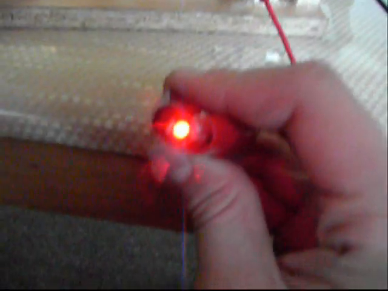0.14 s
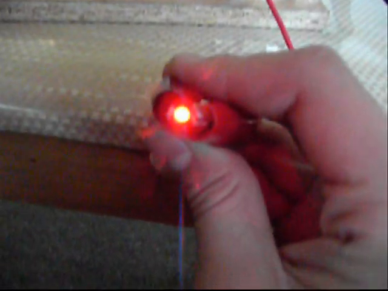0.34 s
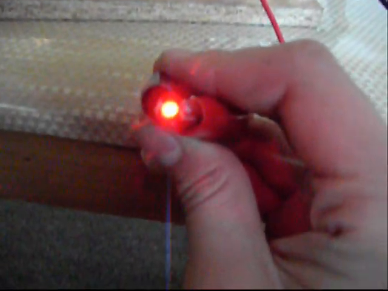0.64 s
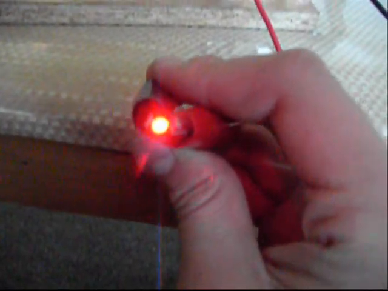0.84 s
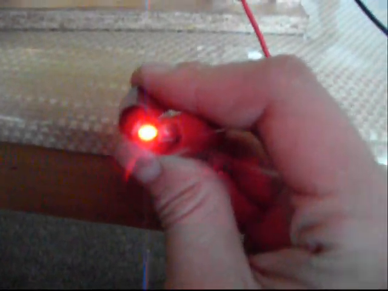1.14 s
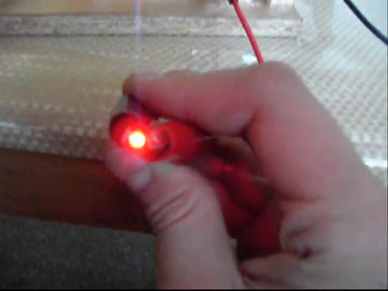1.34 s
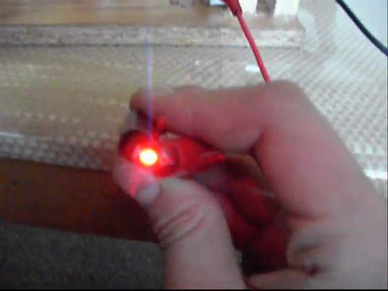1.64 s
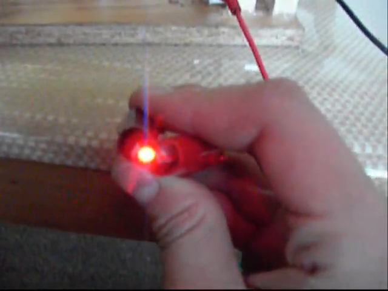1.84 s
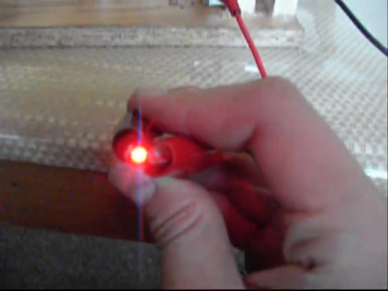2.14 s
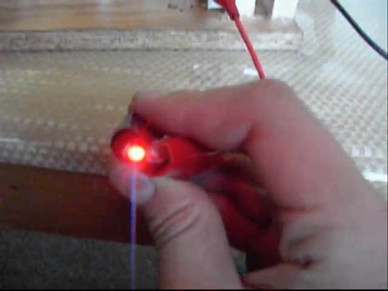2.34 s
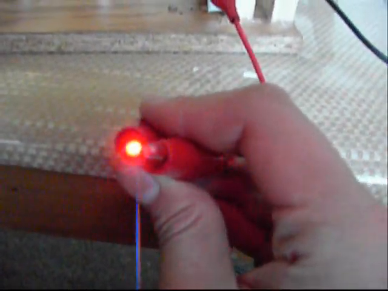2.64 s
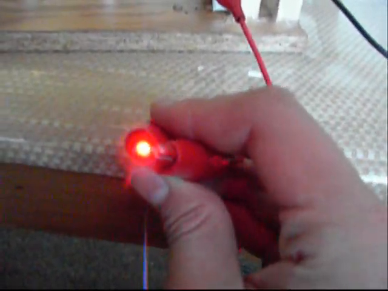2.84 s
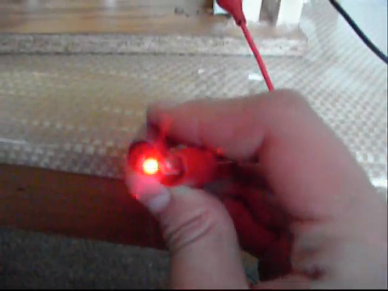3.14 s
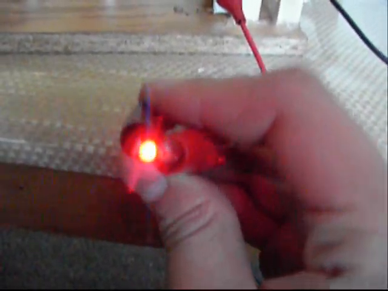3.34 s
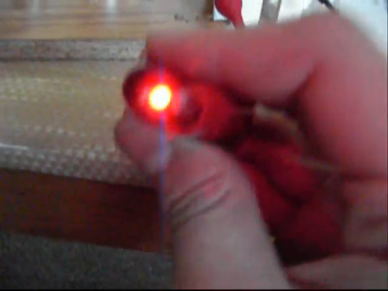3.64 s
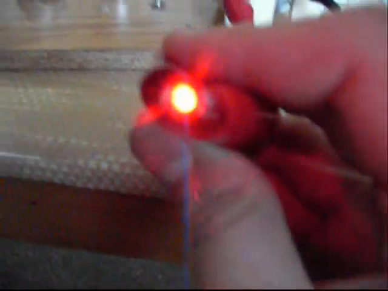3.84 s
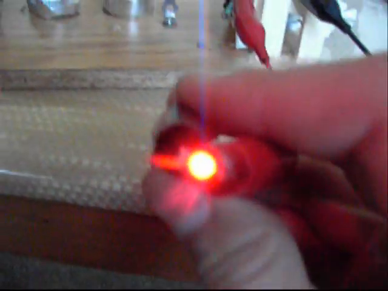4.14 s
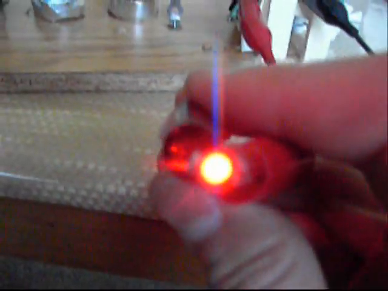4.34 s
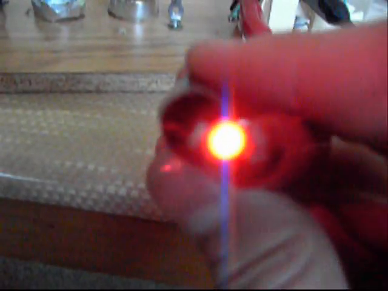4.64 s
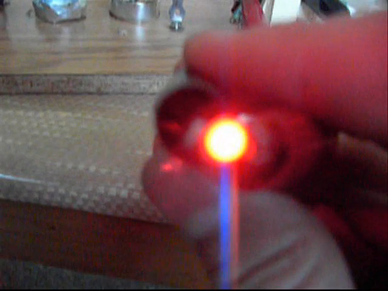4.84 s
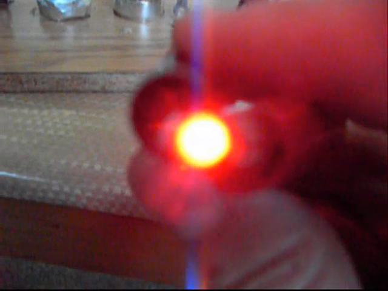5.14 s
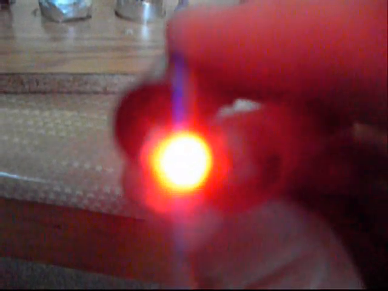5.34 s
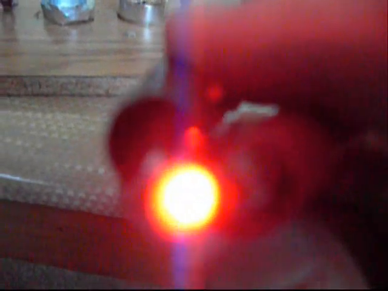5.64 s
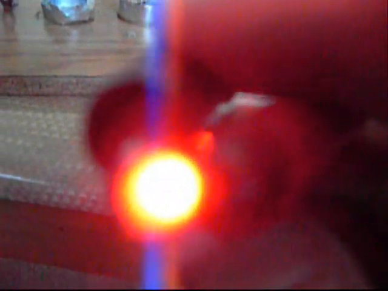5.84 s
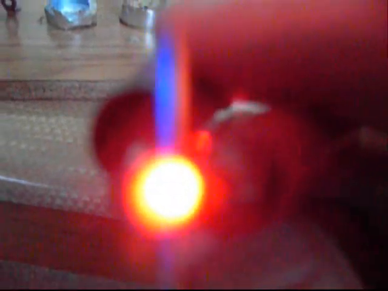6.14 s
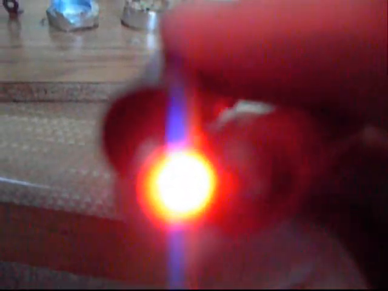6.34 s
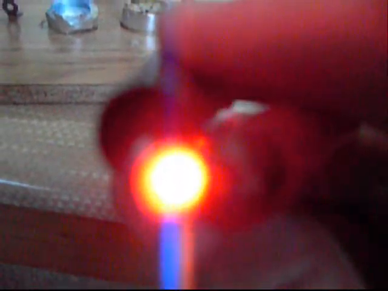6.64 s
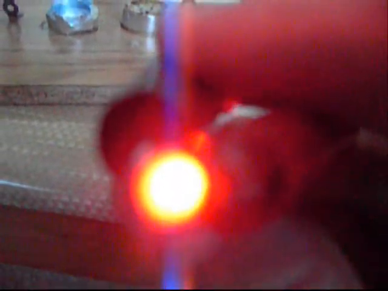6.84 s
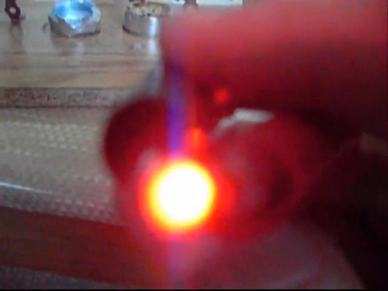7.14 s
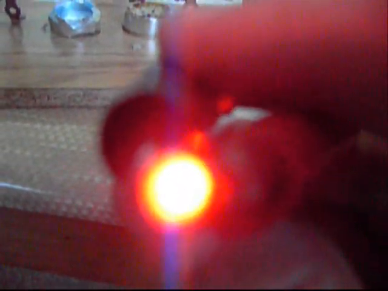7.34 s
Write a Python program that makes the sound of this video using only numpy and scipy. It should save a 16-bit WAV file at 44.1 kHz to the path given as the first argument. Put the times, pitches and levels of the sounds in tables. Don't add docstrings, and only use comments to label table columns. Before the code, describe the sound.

From 0 s a small hot-air engine is already running on a wooden table, close to a crude microphone in a small room. Its linkage knocks with a dry, tinny can-like ring roughly 7.3 times a second, with a usually softer back knock almost midway through each turn, making about fifteen hits a second. Each is followed by a brief grainy piston scrape. From about 1 to 3.4 s the linkage sounds slacker: knocks smear into short rattles with brighter thin-metal rings, and the table hum swells unevenly, notably near 1.4 and 2.8 s. After 3.5 s the beat becomes crisper and cleaner, with small pin ticks just before many strokes. Flame hiss, low rumble and a faint steady mid-pitched generator whine continue throughout, slightly lower after 4.5 s. Knocks soften slightly around 7.1 s; the running continues to the end, about 7.5 s. Coarse digital grit brightens everything.

```python
import sys
import numpy as np
from scipy import signal
from scipy.fft import rfft, irfft
from scipy.io import wavfile
from scipy.ndimage import uniform_filter1d, map_coordinates

SR = 44100
rng = np.random.default_rng(int(sys.argv[2]) if len(sys.argv) > 2 else 0)


def wav_out(sig):
    wavfile.write(sys.argv[1], SR, np.round(np.clip(np.atleast_2d(sig).T, -1, 1) * 32767).astype(np.int16))


def invert_db(x):
    u = np.asarray(x, float) / 20
    return 10 ** u


N = 329868

# pitch_hz [Hz], level_db [dB], fade_s [s to fall 60 dB]
CAN = [(1610, -16, .03), (1735, -11, .03), (1800, -8, .02), (1873, 0, .015), (1990, -7, .014),
       (2092, -4, .016), (2200, -7, .02)]


def unit(x):
    return x / np.sqrt(np.mean(x ** 2))


def coloured(points):
    hz, db = np.transpose(points)
    log_pitch = np.log(np.fft.rfftfreq(N, 1 / SR) + 1)
    gain = invert_db(np.interp(log_pitch, np.log(hz), db))
    return unit(irfft(rfft(rng.standard_normal(N)) * gain, N))


def walk(rate):
    hold = int(SR / rate)
    levels = np.repeat(rng.standard_normal(N // hold + 1), hold)
    return uniform_filter1d(uniform_filter1d(levels, hold), hold)[:N]


def ring(modes, hz=None, reach_hz=230, scatter_db=0, stretch=1, size=SR // 8, against=-1):
    f, db, t60 = np.transpose(modes)[:, :, None]
    if hz:
        db = db - 6 * ((f - hz) / reach_hz) ** 2
    t = np.arange(size) / SR
    sign = against ** np.arange(len(modes))[:, None]
    fade = np.exp(-np.log(1000) * t / t60)
    tones = np.sin(2 * np.pi * f * stretch * t)
    return np.sum(sign * invert_db(db + scatter_db) * fade * tones, axis=0)


def add(out, s, piece):
    i = int(s * SR)
    out[i:i + len(piece)] += piece[:N - i]


def state(s):
    # time_s [s], near_db [dB], slack_db [dB], shake_db [dB]
    slow_changes = [(0, 0, -0.5, 2), (.5, 1.5, 1, 4.5), (1.1, -1, 5, -6.5), (1.4, 3.3, 5, 12),
                    (2.0, 1.5, 8, -2), (2.8, 3, 6.5, 9), (3.25, 4, 1.5, -2.5), (3.75, -2, 4.5, 7.5),
                    (4.1, 2.4, 2, 8), (4.5, -1.5, 1.5, -1.5), (5.25, -2.5, 2.5, -5), (7.0, -2, 0, -1.5),
                    (7.48, -2, 4, 2.5)]
    at, *columns = np.transpose(slow_changes)
    return [np.interp(s, at, c) for c in columns]


def flame_hiss(near_db):
    # pitch_hz [Hz], level_db [dB per Hz]
    flame_colour = [(150, -58.5), (250, -19), (370, -2), (480, -11.5), (650, -2.5), (880, -7.5),
                    (1250, -4.5), (1540, -8), (1900, -2), (2250, -3.5), (2450, -10), (3150, -10),
                    (3700, -11.5), (4500, -35.5)]
    return invert_db(near_db - 36 + walk(9)) * coloured(flame_colour)


def table_drone(shake_db):
    hum_colour = [(250, -37.5), (285, -1.5), (308, 5.5), (335, -0.5), (380, -43.5)]
    return invert_db(shake_db - 48.5 + 4.0 * walk(28)) * coloured(hum_colour)


def table_rumble(near_db, shake_db):
    # pitch_hz [Hz], level_db [dB per Hz]
    rumble_colour = [(20, -31.5), (55, -19), (95, -12.5), (140, -1), (210, 3), (260, -17), (320, -45)]
    return invert_db(-53.5 + 0.24 * shake_db + near_db + 3.0 * walk(16)) * coloured(rumble_colour)


def generator_whine(near_db):
    pitch_hz = 552.3 + 1.5 * walk(3)
    level = np.sqrt(2) * invert_db(-43.5 + .8 * near_db + 1.1 * walk(15))
    return level * np.sin(2 * np.pi * np.cumsum(pitch_hz) / SR)


def rattle(level_db, per_s=1200):
    size_db = np.minimum(4 * rng.exponential(size=N), 10)
    hits = (rng.random(N) < per_s / SR) * invert_db(size_db) * rng.choice([-1, 1], N)
    ringing = signal.fftconvolve(hits, ring(CAN, 2100, 540))[:N]
    return invert_db(level_db + 2.7 * walk(40)) * unit(ringing)


def steady():
    near_db, _, shake_db = state(np.arange(N) / SR)
    table = table_drone(shake_db) + table_rumble(near_db, shake_db)
    return flame_hiss(near_db) + table + generator_whine(near_db) + rattle(near_db - 38)


def strokes():
    # start_s [s], power_knock_db [dB],
    # thin_parts_db [dB against the knock], back_knock_db [dB]
    flywheel_turns = [(0.03, -3.5, -18, -37), (0.1615, -7, -13.5, -14.5), (0.296, -4.5, -12.5, -8.5),
                      (0.4297, -5, -15, -12), (0.5619, -7.5, -6.5, -9), (0.6946, -4.5, -8, -3),
                      (0.8279, -2.5, -15, -9), (0.9631, -7.5, -7.5, -12), (1.0952, -8, -6, -13),
                      (1.2297, -11.5, 0, -6), (1.3632, -9, 0.5, -13.5), (1.5002, -7, -6.5, -5),
                      (1.633, -7, -8.5, -21), (1.7695, -6.5, -9.5, -10), (1.9052, -11, -4, -10),
                      (2.0399, -4.5, -4.5, -5), (2.176, -9.5, -6, -8.5), (2.311, -7.5, -1, -8.5),
                      (2.4468, -8, -0.5, -8), (2.5826, -10, -9, -12), (2.7186, -8, -1.5, -12.5),
                      (2.8564, -9, -8, -8), (2.9904, -4, -6, -17.5), (3.126, -9, -11, -5),
                      (3.2641, -1.5, -8.5, -5.5), (3.3996, -7.5, 1.5, -10),
                      (3.535, -2.5, -14, -8.5), (3.6735, -6, -30, -11.5), (3.81, -7, -13, -4.5),
                     (3.9472, -7, -4, -7), (4.0842, -4, -17, -10), (4.222, -3, -19, -13.5),
                     (4.3595, -4.5, -17, -9), (4.4971, -3.5, -35, -10), (4.6333, -6, -28, -11.5),
                     (4.7716, -6, -13, -10), (4.9089, -4, -19, -10), (5.048, -5, -16, -14),
                     (5.1843, -9, -17, -12.5), (5.3238, -3.5, -14, -10.5), (5.462, -5.5, -21, -16.5),
                     (5.599, -3.5, -23, -10.5), (5.7382, -10.5, -8.5, -13.5), (5.8746, -3, -16.5, -8),
                     (6.0138, -4.5, -20, -27), (6.1519, -2.5, -17, -13), (6.2908, -3.5, -15, -19.5),
                     (6.429, -5, -34, -16.5), (6.5677, -4, -10.5, -17), (6.7053, -9, -15.5, -13),
                     (6.843, -4, -19, -6.5), (6.9819, -2.5, -19, -12), (7.1204, -10, -8.5, -15),
                     (7.2583, -11, -10, -16), (7.3969, -11, -5, -9)]
    s, db, thin_db, back_db = np.transpose(flywheel_turns)
    turn = np.arange(len(s))
    crank_s = np.polyval(np.polyfit(turn, s, 5), turn)
    turn_s = np.gradient(crank_s)
    _, slack, shake = state(s)
    weak = -5.5 - db
    spread, drag, rub, spot = rng.random((len(s), 4)).T

    power_hz = 1930 - 7.5 * slack + 5.5 * weak + 80 * (spot - .5)
    power_ms = 4.6 + 0.72 * slack + 2 * (spread - .5)
    power_frame_db = -26.5 + 3 * weak + 1.6 * slack
    power = (s, db, power_hz, power_ms, thin_db, power_frame_db)

    drag = np.clip(drag ** 3 - .05 * (back_db + 13), 0, 1)
    back_s = crank_s + .447 * turn_s
    back_hz = 2050 + drag * (1950 - 2050)
    back_ms = 2.4 + drag * (9.5 - 2.4)
    back_frame_db = -24 + 8 * drag + 0.35 * slack
    back = (back_s, back_db, back_hz, back_ms, np.full(len(s), -16.), back_frame_db)

    rub_db = -30.5 + 0.54 * slack + 0.3352 * shake + 4 * (rub - .5)
    return power, back, turn_s, rub_db


def pins(crank_s, turn_s):
    # start_s [s], peak_db [dB]
    pin_drops = [(0.0225, -8), (0.4097, -20), (0.813, -12), (1.89, -19), (3.2548, -9), (3.389, -10.5),
                 (3.5219, -25), (3.6556, -13), (4.0747, -8.5), (4.2083, -7.5), (4.3436, -13), (4.481, -8),
                 (4.623, -17), (4.8977, -14), (5.0291, -15), (5.5855, -23), (5.8585, -15), (5.996, -14.5),
                 (6.14, -18), (6.2791, -13), (6.416, -19), (6.554, -21), (6.833, -21), (6.9686, -16)]
    # start_s [s], peak_db [dB]
    stray_ticks = [(0.313, -17), (0.3413, -23), (0.7153, -16), (0.739, -13), (0.7702, -16), (1.128, -19),
                   (1.3054, -25), (1.5165, -14), (1.553, -24), (1.8982, -19), (2.2483, -24), (3.424, -15),
                   (3.4577, -9.5), (3.5865, -24), (3.6276, -16.5), (3.998, -13), (4.0996, -28),
                   (4.127, -28), (4.406, -18), (4.569, -19), (4.7025, -17), (4.8426, -11), (5.116, -24),
                   (5.2336, -17), (6.448, -18), (6.619, -22), (6.8385, -23), (7.0245, -26)]
    # turn_share [fraction of a turn], mean_db [dB]
    faint_ticks = [(.13, -28.5), (.34, -29), (.54, -27.5), (.75, -35)]
    share, db = np.transpose(faint_ticks)
    when, louder = np.moveaxis(rng.standard_normal((len(crank_s), len(faint_ticks), 2)), -1, 0)
    s = crank_s[:, None] + turn_s[:, None] * (share + .025 * when)
    faint = np.c_[s.ravel(), (db + 4 * louder).ravel()]
    return np.r_[pin_drops, stray_ticks, faint[faint[:, 0] < N / SR]]


def contacts(hz, ms, chance, ring_ms):
    rebound_ms = np.cumsum(.5 + ms / 6 * chance[:8])
    rebound_ms = rebound_ms[rebound_ms < ms - ring_ms]
    beat_hz = min((f for f, *_ in CAN[2:]), key=lambda f: abs(f - hz))
    cycles = np.round(rebound_ms * beat_hz / 1000)
    strength = (.28 + .35 * chance[8:8 + len(cycles)]) * (1 - rebound_ms / ms)
    bounces = np.zeros(int(ms * SR / 1000) + 200)
    bounces[np.r_[0, cycles * SR / beat_hz].astype(int)] = np.r_[1, strength]
    return bounces


def knock(db, hz, ms, thin_db, frame_db, chance, ring_ms=3.4):
    # pitch_hz [Hz], level_db [dB], fade_s [s to fall 60 dB]
    frame_tones = [(677, -13.5, 0.023), (920, -6.5, 0.028), (1029, -2.5, 0.028), (1250, 0.5, 0.035),
                   (1322, 6.5, .025), (1464, 7.5, 0.025)]
    thin_tones = [(2590, 5.5, .01), (2633, 2.5, 0.0054), (2970, 4.5, 0.036), (3299, 9, 0.022),
                  (3660, -3, 0.0053), (3570, -5, 0.014)]
    bounces = contacts(hz, ms, chance, ring_ms)
    shift = chance[16:, None] - .5
    reach_hz = 165 + 4 * max(frame_db + 26, 0)
    parts = ((CAN, 0, hz, .01), (frame_tones, frame_db, None, .12), (thin_tones, thin_db, None, .09))
    out = 0
    for modes, part_db, near_hz, loose in parts:
        against = -1 if ms > ring_ms or not near_hz else 1
        sound = ring(modes, near_hz, reach_hz, scatter_db=4.8 * shift[:len(modes)],
                     stretch=1 + loose * shift[-len(modes):], size=SR // 24, against=against)
        part = signal.fftconvolve(bounces, sound)
        out = out + invert_db(db + part_db) * part / np.abs(part).max()
    return out


def linkage(power, back, turn_s):
    # pitch_hz [Hz], level_db [dB], fade_s [s to fall 60 dB]
    board_tones = [(203, -8, 0.059), (309.7, 2.5, 0.15), (314.7, -4.5, 0.28), (351, -9, 0.21),
                   (589, -7.5, 0.17), (724, 4, 0.1)]
    out, thumps = np.zeros(N), np.zeros(N)
    rows = [(*r, 0) for r in zip(*power)]
    rows += [(*r, 3.0) for r in zip(*back)]
    rows += [(s, db - 1.5, 1960, 3.0, -13, -9, -5) for s, db in pins(power[0], turn_s)]
    for row, chance in zip(rows, rng.random((len(rows), 24))):
        s, db, hz, ms, thin_db, frame_db, thump_db = row
        add(out, s, knock(db, hz, ms, thin_db, frame_db, chance))
        add(thumps, s + .004, invert_db(db + thump_db) * np.hanning(60) / 30)
    no_bass = signal.butter(3, 750, "high", fs=SR, output="sos")
    board = signal.fftconvolve(thumps, ring(board_tones))[:N]
    return signal.sosfilt(no_bass, out) + invert_db(-30.5) * board


def scrape(power, back, rub_db, rise_s=0.0099, fall_s=.017):
    # pitch_hz [Hz], level_db [dB per Hz]
    scrape_colour = [(150, -32), (300, -18), (600, 1.5), (1000, -7.5), (1350, 5), (1600, -6.5), (1900, 2),
                     (2400, -7), (3200, -5), (4000, -14.5)]
    swell, t = np.zeros(N), np.arange(SR // 10) / SR
    shape = np.minimum(t / rise_s, 1) ** 2 * np.exp(-np.maximum(t - rise_s, 0) / fall_s)
    power_rub_db = power[1] + 0.31 * power[5] - 16
    for s, db in zip(np.r_[back[0], power[0]], np.r_[rub_db + 3.4, power_rub_db]):
        add(swell, s, invert_db(db) * shape)
    grain = invert_db(np.clip(6.3 * walk(600), -8, 4))
    return swell * grain * coloured(scrape_colour)


def room_tail(engine, t60_s=0.22, level_db=-12):
    t = np.arange(SR // 2) / SR
    fade = np.exp(-np.log(1000) * t / t60_s) * np.minimum(t / 0.0051, 1)
    path = np.arange(N) // (SR // 15) % 5
    room = np.zeros(N)
    for k in range(5):
        echo = fade * rng.standard_normal(len(t))
        room += signal.fftconvolve(engine * (path == k), echo)[:N]
    return invert_db(level_db) * room / np.sqrt(np.sum(fade ** 2))


def scene():
    power, back, turn_s, rub_db = strokes()
    engine = linkage(power, back, turn_s) + scrape(power, back, rub_db)
    return (engine + room_tail(engine) + steady())[None]


def band_limit(x):
    return signal.sosfilt(signal.butter(12, 16810, fs=SR, output="sos"), x)


def record(dry):
    camera_hz, step, top = 8001.5, 1 / 128, .76
    soft = signal.sosfilt(signal.butter(4, 3700, fs=SR, output="sos"), dry[0])
    soft = np.clip(soft, -top, top)
    ticks = np.arange(int(N * camera_hz / SR) + 2) * SR / camera_hz
    sampled = map_coordinates(soft, [ticks], order=3, mode="nearest")
    steps = np.floor(sampled / step) * step
    held = steps[(np.arange(N) * camera_hz / SR).astype(int)]
    body = signal.sosfiltfilt(signal.ellip(8, .1, 50, 15800, fs=SR, output="sos"), held)
    knocking = np.clip(uniform_filter1d(np.abs(held), size=512) / 0.14 - 1, 0, 1)
    mix = body + invert_db(-10) * knocking * (held - body)
    return band_limit(mix[None])


dry = scene()
out = record(dry)
wav_out(out)
```